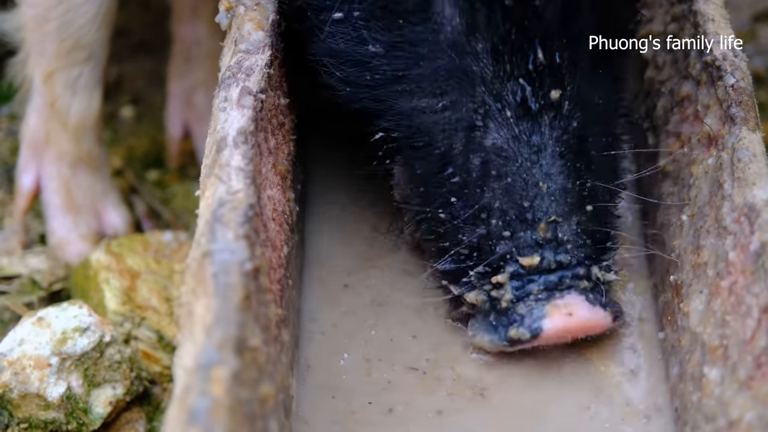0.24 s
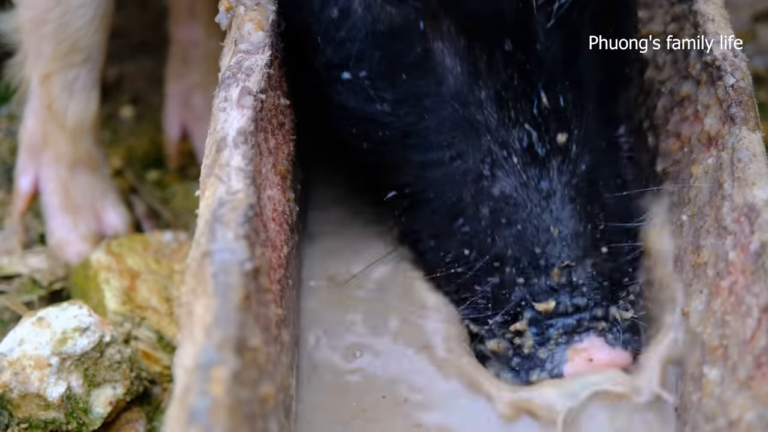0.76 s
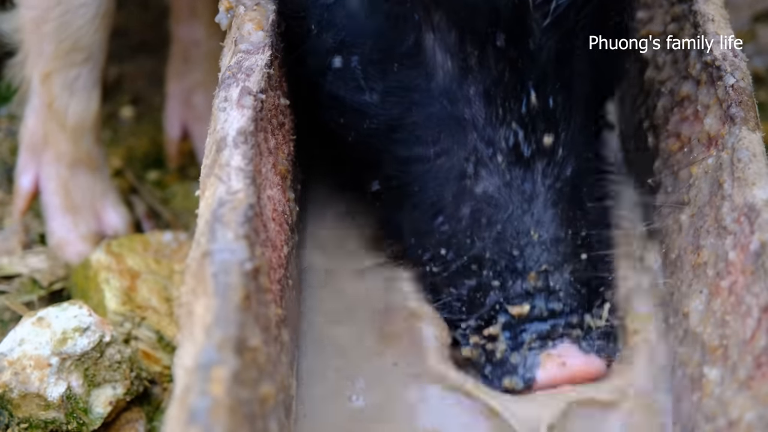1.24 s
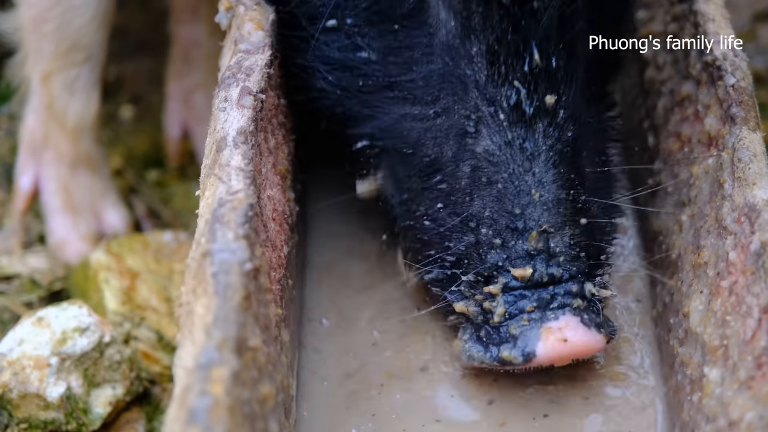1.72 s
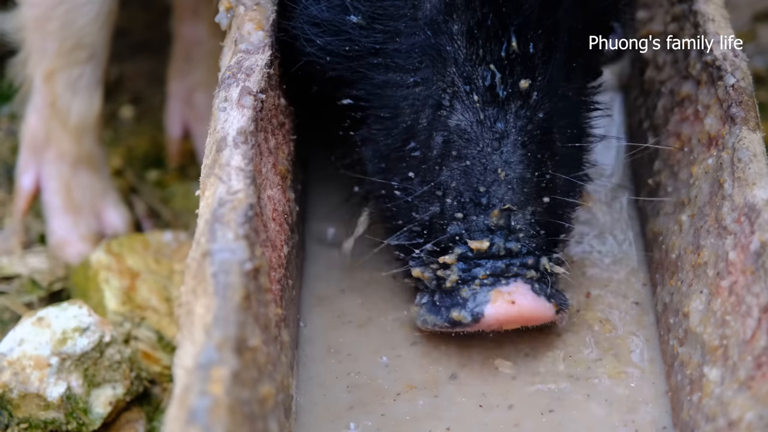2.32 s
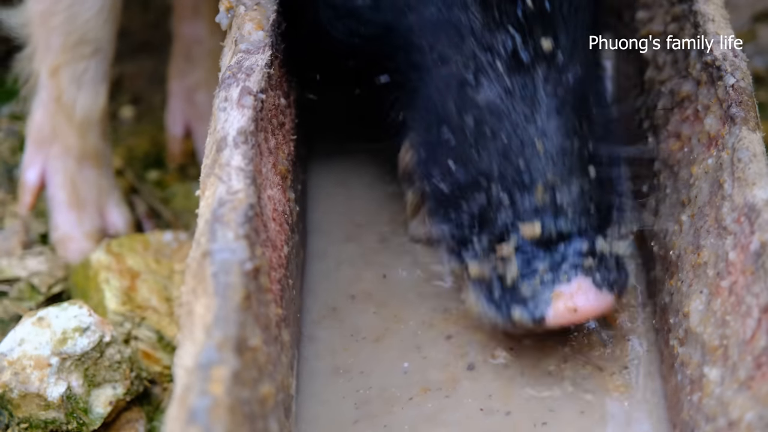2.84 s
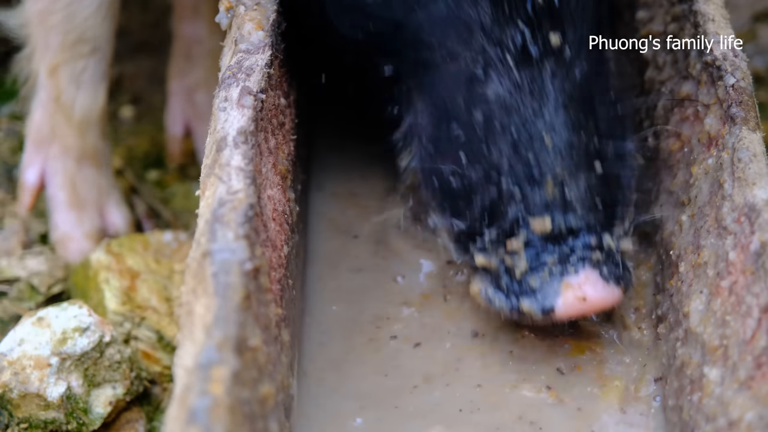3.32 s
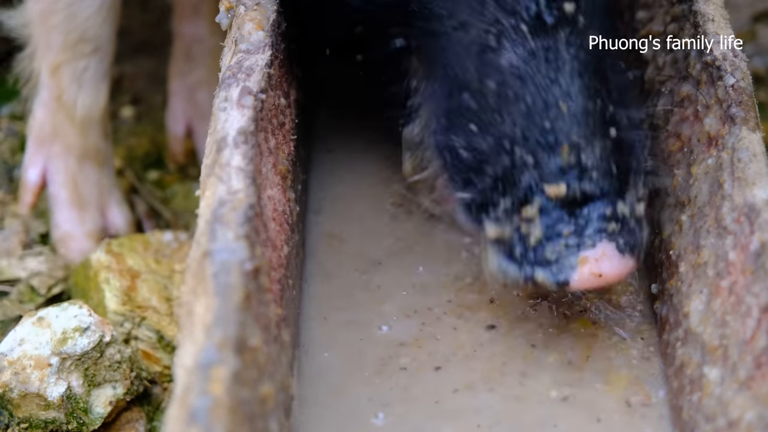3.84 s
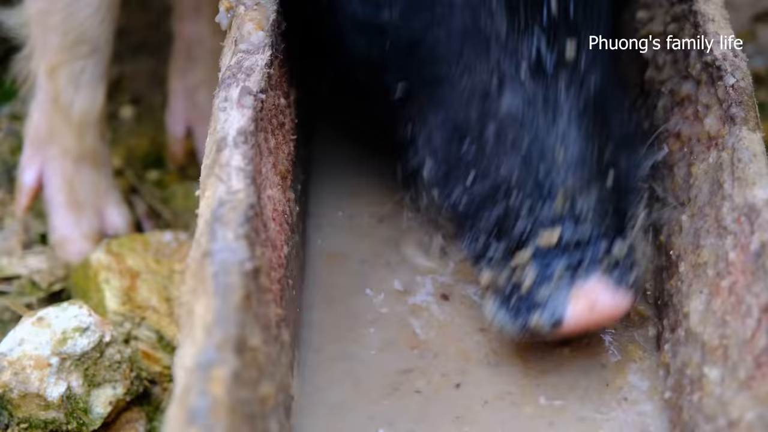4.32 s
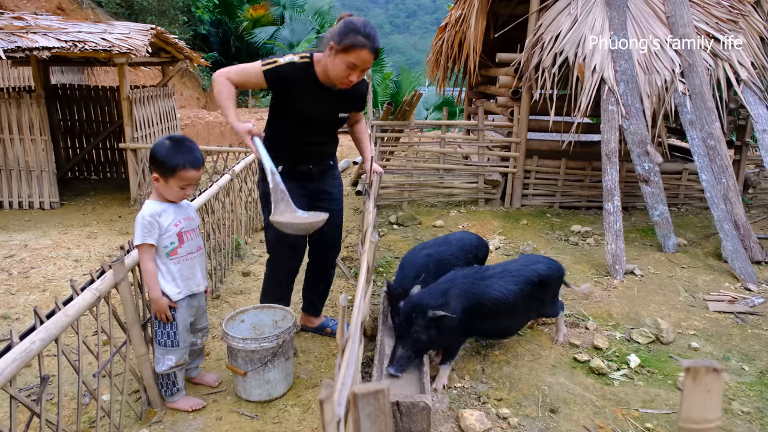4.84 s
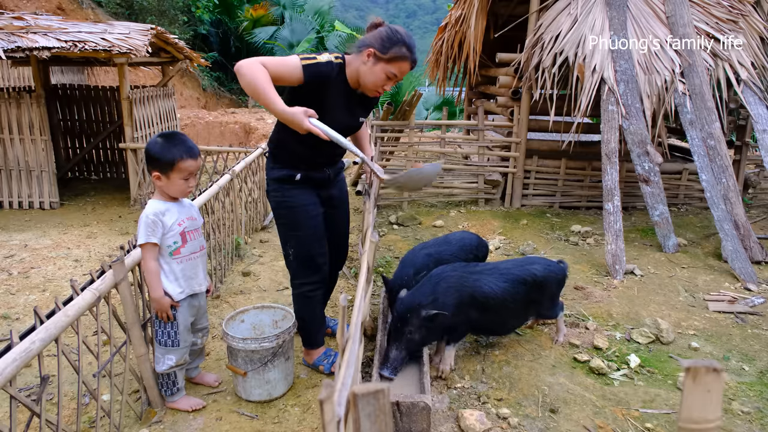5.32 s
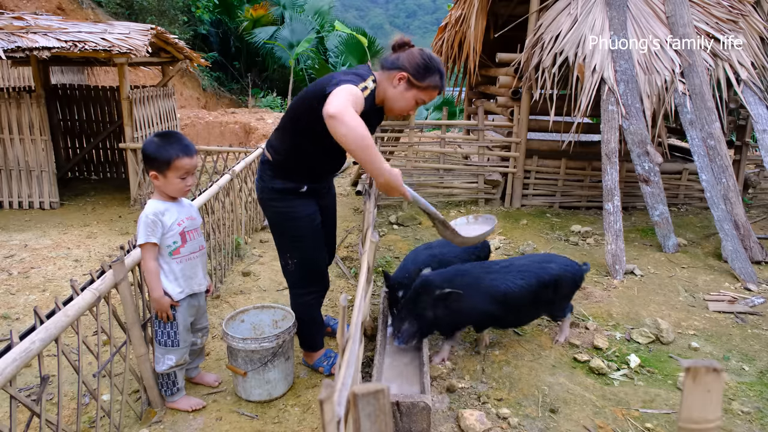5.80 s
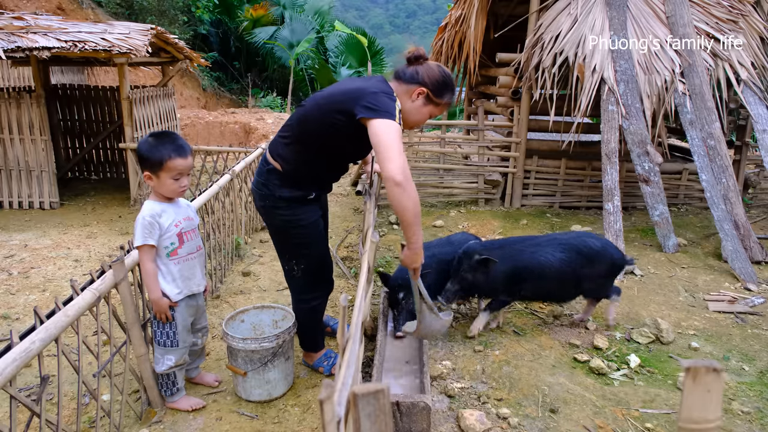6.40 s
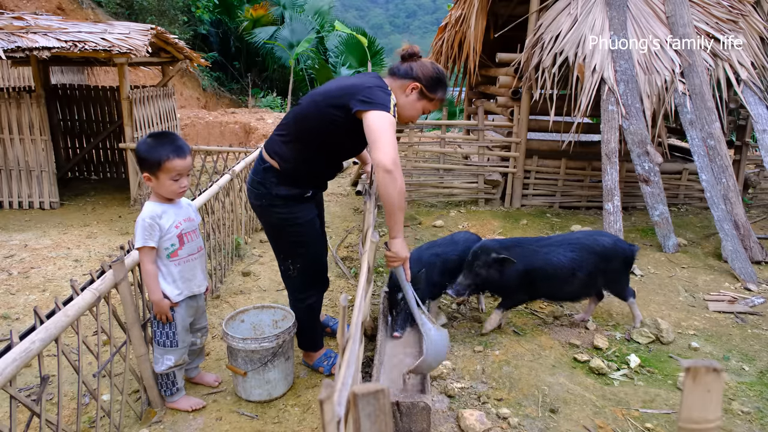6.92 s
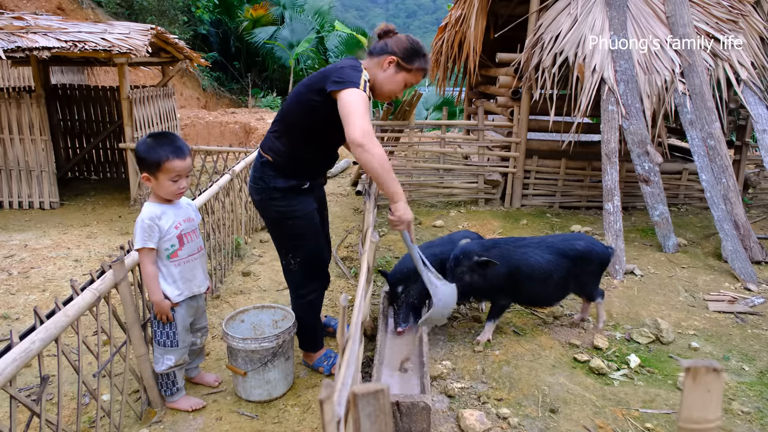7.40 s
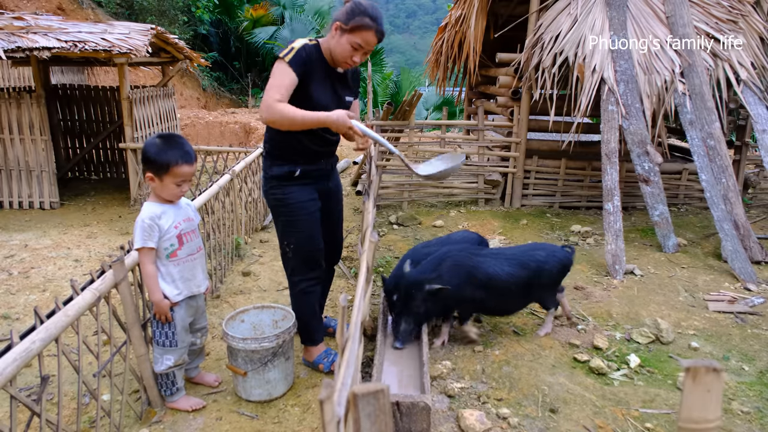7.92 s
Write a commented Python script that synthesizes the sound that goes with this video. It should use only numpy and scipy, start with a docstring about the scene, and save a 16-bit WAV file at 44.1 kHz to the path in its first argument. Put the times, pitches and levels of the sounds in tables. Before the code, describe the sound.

Rapid juicy pig chewing, about four chews a second, with popping lips and bubbly squelches; halfway, open yard air, chirping and peeping join in.

```python
"""A pig eats wet feed from a wooden trough: each chew licks, sucks and squeezes the slurry, made of tiny bubbles.
Lips smack with a pop and a ringing mouth cavity, films snap in bursts of bubbles, and the jaw thumps as sagging tones.
At first the snout is close; then the pigs are heard from across the yard, with more air and shuffling feet.
Filtered noise makes the air, the feet and the insects; gliding tones make a peeping chick
and a small bird that chirps again and again."""
import sys
import numpy as np
from scipy import signal
from scipy.fft import rfft, irfft, next_fast_len
from scipy.io import wavfile
from scipy.ndimage import uniform_filter1d, map_coordinates

SR = 44100
rng = np.random.default_rng(int(sys.argv[2]) if len(sys.argv) > 2 else 0)


def persist_wave(psi):
    """Save psi, clipped to +-1, as 16-bit WAV."""
    counts = np.round(np.clip(psi, -1, 1) * 32767).astype(np.int16)
    wavfile.write(sys.argv[1], SR, np.atleast_2d(counts).T)


N = 359856
FAR_S = 4.68  # from here on the pigs are heard from across the yard
TOP_HZ = 15900  # upper limit of the whole sound


def amp(db):
    """Turn decibels into a gain."""
    return 10 ** (np.asarray(db) / 20)


def unit(x):
    """Scale to an average (rms) strength of 1."""
    return x / np.sqrt(np.mean(x ** 2) + 1e-20)


def along(points, hz):
    """Read a curve of (Hz, value) points at any frequency, on a log axis."""
    point_hz, values = np.transpose(points)
    return np.interp(np.log(hz + 1), np.log(point_hz), values)


def add(track, start_s, sound):
    """Mix a sound into the track, cutting what falls outside."""
    i = round(start_s * SR)
    part = sound[..., max(-i, 0):max(N - i, 0)]
    first = max(i, 0)
    track[..., first:first + part.shape[-1]] += part


def filtered(x, response):
    """Multiply the spectrum of x by a response of frequency."""
    size = next_fast_len(N + SR // 2)
    spectrum = rfft(x, size) * response(np.fft.rfftfreq(size, 1 / SR))
    return irfft(spectrum, size)[..., :N]


def coloured(x, points, size=2048):
    """Give x the gains of (Hz, dB) points, with a filter that never answers before the sound."""
    gains = amp(along(points, np.fft.rfftfreq(size, 1 / SR)))
    cepstrum = irfft(np.log(gains))
    fold = np.r_[1, np.full(size // 2 - 1, 2), np.zeros(size // 2)]  # moves the answer to positive times
    answer = irfft(np.exp(rfft(cepstrum * fold)))
    return signal.fftconvolve(x, answer[None], axes=1)[:, :N]


def ringing(hz, centre, width):
    """Response of one resonance: strongest at its centre, sharper when narrow."""
    return 1j * hz * width / (centre ** 2 - hz ** 2 + 1j * hz * width)


def wobble(rate, size=N):
    """A smooth random curve through `rate` random values a second."""
    values = rng.standard_normal(int(size * rate / SR) + 4)
    return map_coordinates(values, [np.arange(size) * rate / SR])


def far():
    """0 beside the trough, 1 across the yard, with a 20 ms passage between."""
    return np.clip((np.arange(N) / SR - FAR_S) / .02, 0, 1)


# shape of the open-air hush: (pitch_hz, level_db per Hz, relative)
AIR_SHAPE = [(30, -0.5), (70, 6), (350, -2.5), (700, -4.5), (1800, -12.5), (3000, -7), (5500, -8.5),
             (8500, -19)]


def air(near_db=-63, far_db=-56, insect_db=-10.0):
    """Soft outdoor hush, narrower in the bass and wider in the treble; insects in one band near, two from afar."""
    noise = rng.standard_normal((2, N))

    def hush(hz):
        """Gains of the middle and of the left-right difference."""
        return amp(along(AIR_SHAPE, hz)) * np.array([np.ones_like(hz), np.minimum(.5 + hz / 7000, 1)])

    def shrill(centre, width):
        """A narrow band of insect noise."""
        hiss = rng.standard_normal((2, N))
        return unit(filtered(hiss, lambda hz: ringing(hz, centre, width) ** 2))

    mid, side = filtered(noise, hush)
    insects = shrill(7150, 850) + .8 * far() * shrill(5600, 180)
    level_db = near_db + (far_db - near_db) * far() + wobble(2.9)
    return (unit(np.array([mid + side, mid - side])) + amp(insect_db) * insects) * amp(level_db)


def bubbles(times, hz, sizes, cycles, length, rise=0.25, lag_s=.00004, order=600):
    """Stereo sum of tiny ringing bubbles; each rises in pitch as it fades, with its own lag between the sides."""
    t = np.arange(order) / SR  # each bubble lasts `order` samples
    hz = np.minimum(hz, TOP_HZ)[:, None]
    decay_s = (cycles / hz + .0003) * np.exp(.4 * rng.standard_normal(hz.shape))
    age = t / decay_s
    swell = sizes[:, None] * np.exp(-age) * (1 - np.exp(-2 * t * hz))
    phase = 2 * np.pi * (hz * t * (1 + rise * (1 - np.exp(-age / 2))) + rng.random(hz.shape))
    skew = np.pi * hz * lag_s * rng.standard_normal(hz.shape)
    at = (np.maximum(times, 0)[:, None] * SR).astype(int) + np.arange(order)

    def one_side(sign):
        """Sum all bubbles on one side."""
        ring = swell * np.sin(phase + sign * skew)
        return np.bincount(at.ravel(), ring.ravel(), length)[:length]

    return np.array([one_side(1), one_side(-1)])


LICK_LEAD_S, LICK_S, LICK_DB = .065, .026, -12  # a soft lick: lead on the suck, length, level against the suck
WASH_DB, WASH_EXTRA_S = -13.5, .04  # slurry swills through the chew: under its strokes, a little longer than the wait
SQUEEZE_SHARE = .85  # a squeeze's length over that of its suck
USUAL_DB, BUBBLE_HZ, BUBBLE_OCT_PER_DB = -36, 1228, 0.0825  # usual stroke; harder ones make bigger, lower bubbles
SPRAY_DB, SPRAY_GROWS = -42.5, 0.98  # spray of a usual stroke before its trim; its dB per dB of stroke
# the jaw works about four times a second, a suck and then a squeeze (levels before the final trims):
# (suck_middle_s, suck_length_s, suck_level_db, wait_for_squeeze_s, squeeze_level_db)
JAW_CHEWS = [(0.151, 0.044, -35.5, 0.034, -45.5), (0.419, 0.038, -33, .085, -38),
             (0.694, 0.061, -36, .1, -37.5), (0.975, .032, -32.5, .07, -30),
             (1.284, 0.036, -35.5, 0.028, -39), (1.511, .054, -39.5, 0.047, -37.5),
             (1.713, 0.067, -36, 0.067, -39), (1.98, 0.029, -33.5, .04, -34.5),
             (2.304, .03, -30.5, 0.066, -37), (2.593, 0.051, -31.5, 0.099, -42.5),
             (2.811, 0.037, -37, 0.071, -37.5), (2.954, .029, -35.5, .12, -29.5),
             (3.118, .019, -36.5, .057, -33), (3.397, 0.035, -37, .044, -28.5),
             (3.638, .03, -39, 0.067, -41.5), (3.751, 0.02, -43.5, .057, -37),
             (3.925, .034, -41, 0.038, -34.5), (4.092, .038, -43, 0.087, -34.5),
             (4.401, .054, -36.5, 0.098, -49), (4.584, 0.033, -49.5, .042, -32),
             (4.796, .034, -36.5, 0.034, -34.5), (5.05, .06, -37, 0.11, -49), (5.231, .04, -42, .045, -40),
             (5.427, 0.031, -38, 0.084, -40.5), (5.657, 0.069, -45.5, .11, -43),
             (5.897, .04, -38.5, 0.063, -36), (6.246, .034, -38, 0.082, -44),
             (6.548, 0.069, -46.5, .11, -41.5), (6.778, .048, -29.5, 0.094, -43),
             (6.968, 0.028, -37, 0.039, -33.5), (7.247, .026, -35.5, 0.057, -49.5),
             (7.535, 0.032, -39, 0.05, -44.5), (7.75, 0.04, -42.5, 0.042, -39),
             (7.939, 0.03, -43, .094, -36)]


def strokes():
    """Every chew licks, sucks, swills and squeezes: rows of (middle_s, length_s, bubble_db, bubble_hz, spray_db)."""
    rows = []
    for s, length, suck_db, wait, squeeze_db in JAW_CHEWS:
        lick = (s - LICK_LEAD_S, LICK_S, suck_db + LICK_DB)
        suck = (s, length, suck_db)
        swill = (s + wait / 2, wait + WASH_EXTRA_S, (suck_db + squeeze_db) / 2 + WASH_DB)
        squeeze = (s + wait, length * SQUEEZE_SHARE, squeeze_db)
        for middle, lasts, db in (lick, suck, swill, squeeze):
            effort_db = db - USUAL_DB
            hz = BUBBLE_HZ * 2 ** (-BUBBLE_OCT_PER_DB * effort_db)
            rows.append((middle, lasts, db, hz, SPRAY_DB + SPRAY_GROWS * effort_db))
    return rows


def slurps(spread=0.2724, glide=0.27, bubble_rate=1300, bubble_cycles=1.8, spray_rate=1500, spray_hz=3450,
           clump_db=6, bubble_db=0.5, spray_db=-2, fizz_db=-5.0):
    """Each stroke is a swarm of bubbles whose pitch slides with the mouth's opening; torn films spit drops and fizz."""
    track = np.zeros((2, N))
    noise = rng.standard_normal((2, N))
    foam = unit(filtered(noise, lambda hz: 1 / np.hypot(1, (3500 / (hz + 1)) ** 2)))  # bright hiss
    for middle, length, db, hz, fine_db in strokes():
        span = 3 * max(length, .005)
        n = int((span + .02) * SR)
        # the flow swells and fades around the middle, in uneven spurts 4 ms apart
        knots = np.arange(0, span, .004)
        flow = amp(clump_db * rng.standard_normal(len(knots))) / np.cosh(7 * (knots / span - .5)) ** 1.5
        tearing = flow * amp(clump_db * rng.standard_normal(len(knots)))

        def swarm(rate, centre, strength, order):
            """Bubbles of scattered size around a gliding pitch, `rate` a second."""
            u = rng.random(int(rate * span) + 2)
            scatter = spread * rng.triangular(-2, 0, 3, len(u))
            slide = glide * rng.uniform(-0.96, 1) * np.sin(2 * np.pi * u)
            sizes = np.interp(u * span, knots, strength) * rng.exponential(size=len(u))
            pitch = centre * np.exp(scatter + slide)
            return unit(bubbles(u * span, pitch, sizes, bubble_cycles, n, order=order))

        body = amp(db + bubble_db) * swarm(bubble_rate, hz, flow, order=600)
        spray = amp(spray_db) * swarm(spray_rate, spray_hz, tearing, order=160)
        foam_piece = foam[:, rng.integers(N - n):][:, :n]
        fizz = amp(fizz_db) * unit(foam_piece * np.interp(np.arange(n) / SR, knots, tearing, right=0))
        stroke = body + amp(fine_db) * (spray + fizz)
        add(track, middle - span / 2, np.sqrt(length * SR / n) * stroke)
    return track


def dribble(near_db=-52, far_db=-53, count=9000):
    """Bubbles keep crackling in the slurry, louder around each mouthful and never quite silent."""
    busy = np.zeros(N)
    for s, length, _, wait, *_ in JAW_CHEWS:
        add(busy, s - length, np.ones(int(abs(wait + 2 * length) * SR)))
    busy = np.abs(uniform_filter1d(np.minimum(busy, 1), size=6000))
    # about half of the bubbles burst in small smacks, the rest one by one
    clusters = rng.choice(rng.uniform(0, N / SR, size=170), count) + rng.exponential(.003, count)
    times = np.where(rng.random(count) < .5, clusters, rng.uniform(0, N / SR, count))
    pitch = 1450 * np.exp(rng.triangular(-.9, 0, 1.1, count))
    wet = bubbles(times, pitch, rng.exponential(size=count), 2.6, N, order=350)
    return unit(wet) * (busy + 0.43) * amp(near_db + (far_db - near_db) * far())


# lips and tongue pull open a wet cavity: (start_s, level_db before the trims, cavity_pitch_hz before its glide)
LIP_SMACKS = [(0.04, -34, 1650), (0.079, -22, 972), (0.172, -12, 1037), (0.271, -41, 1680),
              (0.384, -32, 1080), (0.438, -17, 1070), (0.513, -18, 1375), (0.614, -27, 930),
              (0.649, -25, 1150), (0.704, -17.5, 1024), (0.824, -28, 607), (0.954, -17, 910),
              (1.304, -17, 743), (1.456, -23.5, 1550), (1.524, -17.5, 1017), (1.643, -20.5, 826),
              (1.899, -32.5, 1650), (1.96, -20, 1005), (2.021, -23, 975), (2.105, -42, 596),
              (2.155, -33, 910), (2.287, -17, 1200), (2.371, -26.5, 1170), (2.523, -28, 830),
              (2.551, -27.5, 1270), (2.579, -23, 1400), (2.695, -22.5, 1090), (2.822, -17, 1726),
              (2.946, -22, 1230), (3.035, -26, 1680), (3.07, -19, 684), (3.154, -19.5, 1150),
              (3.187, -12.5, 1235), (3.39, -24, 1050), (3.747, -28, 1630), (3.795, -23.5, 663),
              (3.878, -26, 1246), (4.079, -27.5, 1030), (4.156, -17.5, 1000), (4.198, -26, 660),
              (4.36, -28.5, 1630), (4.4, -15.5, 910), (4.42, -24, 1680), (4.494, -26.5, 760),
              (4.627, -16.5, 638), (4.749, -31, 1580), (4.808, -10.5, 1430), (5.134, -29.5, 1210),
              (5.423, -27, 1150), (5.553, -35.5, 1490), (5.65, -29.5, 1530), (5.709, -26, 1650),
              (5.778, -33, 1600), (5.901, -31, 1060), (6.247, -29, 1144), (6.521, -24, 1400),
              (6.557, -23.5, 1420), (6.636, -25, 1460), (6.762, -19, 1150), (6.775, -16, 1000),
              (6.968, -25, 1720), (7.001, -15.5, 1490), (7.249, -22, 1300), (7.449, -38, 1670),
              (7.537, -28.5, 1210), (7.802, -32, 800), (7.935, -29, 1590), (8.123, -34, 1140)]


def smacks(opening_s=0.002, pulse_s=0.0011, ring_s=0.0034, glide=0.2, pop_db=-5.5, push_db=-19, click_db=-23,
           even_db=-36, damping=0.64):
    """A wet seal parts with a click and a short pulse; the mouth cavity rings on, most after a gentle smack."""
    track, t = np.zeros((2, N)), np.arange(SR // 25) / SR

    def burst(x):
        """Give every burst the energy of 5 ms at strength 1."""
        return unit(x) * np.sqrt(.005 / t[-1])

    for s, db, hz in LIP_SMACKS:
        decay = ring_s * np.exp(.15 * rng.standard_normal())
        parting = np.exp(-((t - opening_s) / pulse_s) ** 2)
        cavity = amp(damping * (even_db - db)) * (1 - np.exp(-(t / opening_s) ** 2)) * np.exp(-t / decay)
        swell = parting + 2 * cavity
        pitch_hz = hz * (1 + glide * rng.uniform(-.5, 1) * np.tanh((t - opening_s) / decay))
        phase = 2 * np.pi * np.cumsum(pitch_hz) / SR
        upper = 0.34 * np.sin(phase * rng.uniform(1.443, 2.31))  # the cavity's second resonance
        pop = burst(swell * (np.sin(phase + rng.uniform(0, 2 * np.pi)) + upper))
        push = burst(swell * np.sin(2 * np.pi * 230 * t))  # the lips shove a little air
        when, pitch, size = rng.random((3, 70))
        click_hz = 2500 * (TOP_HZ / 2500) ** pitch
        click = bubbles(-opening_s * np.log(1 - when), click_hz, size, 2, len(t), order=200)
        lips = pop + amp(push_db) * (700 / hz) ** 2 * push
        add(track, s, amp(db + pop_db) * lips + amp(db + click_db) * burst(click))
    return track


# a film of slurry tears with a bright snap: (start_s, level_db before the trim, middle_pitch_hz)
FILM_SNAPS = [(0.1503, -19.5, 4560), (0.6619, -11.5, 2610), (0.9246, -22, 3420), (1.056, -24, 3420),
              (1.3008, -17.5, 4960), (1.993, -19.5, 3040), (2.3216, -23, 2500), (2.65, -22, 2340),
              (2.69, -15.5, 5100), (2.808, -19, 3900), (2.8784, -29, 2720), (2.9603, -13, 3750),
              (3.0664, -11, 2420), (3.3425, -19, 4270), (3.6875, -11.5, 3940), (3.9704, -21, 3500),
              (5.466, -18.5, 3300), (5.9713, -21, 4600), (6.3165, -26, 3130), (6.8016, -24.5, 2590),
              (8.0288, -15.5, 2950)]


def snaps(spread=0.425, scatter_s=0.0018, cycles=2.65, snap_db=-14, count=60):
    """A tearing film bursts into a few milliseconds of tiny, high bubbles."""
    track, n = np.zeros((2, N)), SR // 25
    for s, db, hz in FILM_SNAPS:
        when, size = rng.exponential(size=(2, count))
        pitch = hz * np.exp(spread * rng.standard_normal(count))
        burst = bubbles(scatter_s * when, pitch, size, cycles, n, order=200)
        add(track, s, amp(db + snap_db) * unit(burst) * np.sqrt(.005 * SR / n))
    return track


# colour of the trough's hollow: (pitch_hz, gain_db)
TROUGH_COLOUR = [(100, 0.5), (400, -1), (600, 6), (800, 0), (1700, -1.5), (2700, -2), (3700, 1.5),
                 (8000, 1.5), (15000, 7.5)]
# the trough's cross resonances, heard from afar: (centre_hz, width_hz, gain_db)
TROUGH_HOLLOW = [(1075, 133, -1.5), (1575, 170, -2), (2120, 260, -6)]


def in_trough(mouth):
    """The wooden hollow colours the mouth sounds; from afar its resonances ring through."""
    mouth = coloured(mouth, TROUGH_COLOUR)

    def resonances(hz):
        """Direct sound plus each cross resonance."""
        return 0.81 + sum(amp(db) * ringing(hz, centre, width) for centre, width, db in TROUGH_HOLLOW)

    hollow = filtered(mouth, resonances)
    return mouth + far() * (hollow - mouth)


def echoes(x, t60_s, width):
    """A diffuse, dulled answer of nearby surfaces; its treble differs between left and right."""
    t = np.arange(int(t60_s * SR)) / SR  # the tail falls by 60 dB in this time
    out = np.zeros((2, N))
    for i in range(0, N, SR // 4):  # a new random tail every quarter second
        tails = unit(rng.standard_normal((2, len(t))) * amp(-60 * t / t60_s)) / np.sqrt(len(t))
        answer = signal.fftconvolve(x.mean(0)[None, i:i + SR // 4], tails, axes=1)
        add(out, i / SR + t60_s / 20, answer)

    def dulled(hz):
        """Gains of the middle and of the left-right difference."""
        return np.array([np.ones_like(hz), np.minimum(width + hz / 5000, 1)]) / np.hypot(1, hz / 7000)

    mid, side = filtered(out, dulled)
    return np.array([mid + side, mid - side])


# dull chomps and bumps on the trough: (start_s, level_db before the trim, middle_pitch_hz)
JAW_THUMPS = [(0.795, -36, 202), (0.952, -25.5, 300), (1.301, -31.5, 342), (1.643, -31, 326),
              (2.4, -31, 358), (2.596, -35.5, 239), (2.822, -22.5, 350), (4.4, -31, 344), (4.627, -31, 342),
              (5.038, -32.5, 225), (6.083, -34.5, 189), (6.317, -32, 440), (7.0, -35.5, 287),
              (7.795, -35.5, 200)]


def thumps(t60_s=0.026, thump_db=3.5, sag=0.15):
    """Jaw and snout knock the damp wood: a dull push that sags in pitch and hardly rings."""
    track, t = np.zeros(N), np.arange(SR // 8) / SR
    for s, db, hz in JAW_THUMPS:
        pitch = hz * (1 + sag - 2 * sag * np.tanh(2 * t / t60_s))
        knock = np.sin(2 * np.pi * np.cumsum(pitch) / SR)
        add(track, s, amp(db + thump_db - 60 * t / t60_s) * (1 - np.exp(-t / 0.00036)) * knock)
    return track


def shuffle(middle_s=5.84, length_s=0.21, db=-54, hz=200):
    """Feet shuffle on packed earth as low, uneven noise, most of all as the pigs shove each other."""
    noise = filtered(rng.standard_normal(N), lambda f: ringing(f, hz, 170))
    thuds = unit(noise * amp(3 * wobble(30)))
    shove = np.exp(-((np.arange(N) / SR - middle_s) / length_s) ** 2)
    return amp(db) * thuds * (shove + 0.24 * far())


# a small bird's buzzy chirps: (start_s)
BIRD_CHIRPS = [4.74, 5.19, 5.599, 6.027, 6.437, 6.876, 7.308, 7.711]
# a chick's rising peeps: (start_s)
CHICK_PEEPS = [4.885, 5.325, 5.753, 6.17, 6.572, 7.03, 7.447, 7.863]
# a small bird's thin level whistles: (start_s)
BIRD_WHISTLES = [5.25, 6.36]


def birds(chirp_hz=5950, peep_hz=3080, whistle_hz=5850, chirp_s=0.081, peep_s=0.088, whistle_s=0.098,
          chirp_db=-49, peep_db=-48.0, whistle_db=-57):
    """Chirps are fast trills with a falling undertone; peeps slide up and level off; whistles nearly hold pitch."""
    track = np.zeros(N)

    def tone(hz):
        """A sine that follows a changing pitch."""
        return np.sin(2 * np.pi * np.cumsum(hz) / SR)

    for s in BIRD_CHIRPS:
        u = np.linspace(0, 1, int(chirp_s * SR))
        trill = 1 + 0.068 * wobble(710, len(u))
        high = tone(chirp_hz * trill * (1 - .2 * np.exp(-7 * u)))
        low = .8 * u * tone(chirp_hz / 2 * trill ** 3 * (1.2 - .28 * u))
        add(track, s, amp(chirp_db + rng.normal()) * np.sin(np.pi * u) * (high + low))
    for s in CHICK_PEEPS:
        u = np.linspace(0, 1, int(peep_s * SR))
        bend = rng.uniform(.3, .65) * (u - .6) ** 2
        pitch = peep_hz * (1 - bend + .04 * rng.random() * wobble(600, len(u)))
        add(track, s, amp(peep_db + 2.3 * wobble(155, len(u))) * np.sin(np.pi * u) * tone(pitch))
    for s in BIRD_WHISTLES:
        u = np.linspace(0, 1, int(whistle_s * SR))
        pitch = whistle_hz * (1 + .011 * wobble(500, len(u)))
        add(track, s, amp(whistle_db) * np.sin(np.pi * u) * tone(pitch))
    return np.array([track, track])


def scene():
    """Mix the mouth in its trough, the birds, the feet and the air; from afar the yard answers more."""
    mouth = in_trough(slurps() + dribble() + smacks() + snaps()) + thumps()
    mouth = mouth + echoes(mouth * amp(-7), t60_s=.03, width=0.022)
    song = birds()
    yard = echoes(mouth * amp(-27.5 + 3.9 * far()), t60_s=0.17, width=0.17)  # fence and huts
    song = song + echoes(.5 * song, t60_s=0.18, width=.5)  # trees
    sound = mouth + song + yard + shuffle() + air()
    lean_db = np.array([[.5], [-.5]]) * (far() - 0.32)  # a little right at first, then a little left
    return sound * amp(lean_db)


def record(dry):
    """Keep nothing above the upper frequency limit."""
    return filtered(dry, lambda hz: hz < TOP_HZ)


dry = scene()
out = record(dry)
persist_wave(out)
```